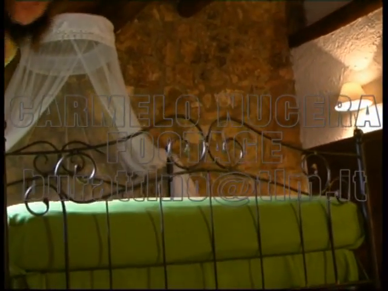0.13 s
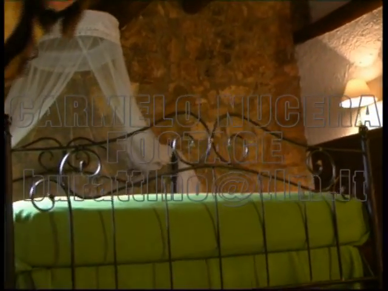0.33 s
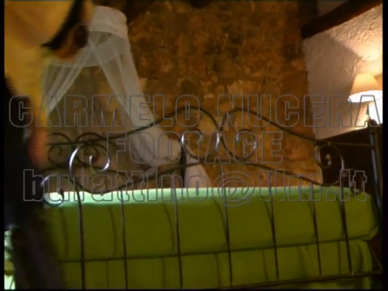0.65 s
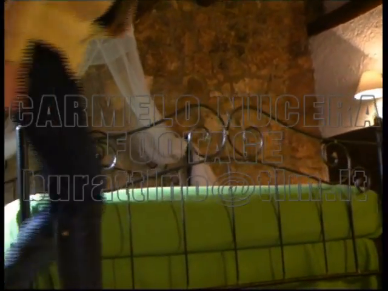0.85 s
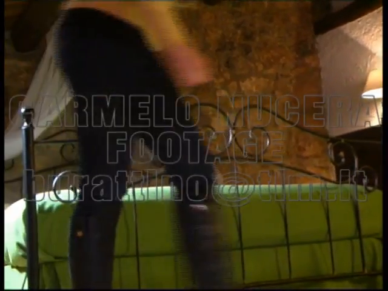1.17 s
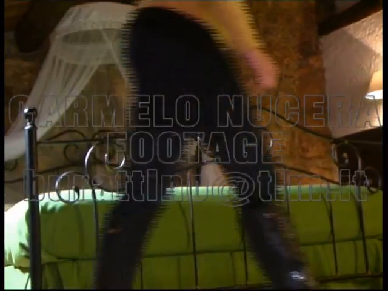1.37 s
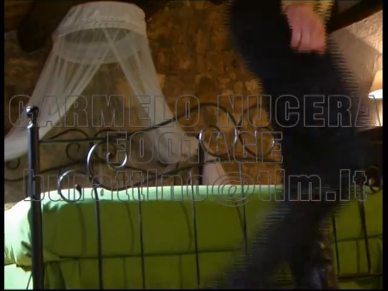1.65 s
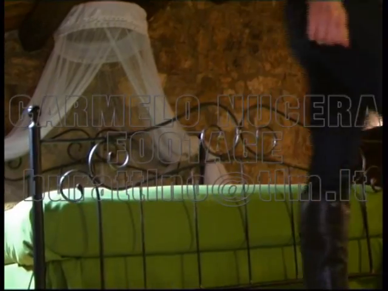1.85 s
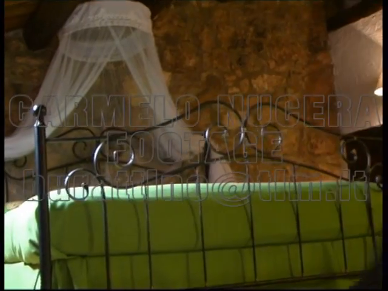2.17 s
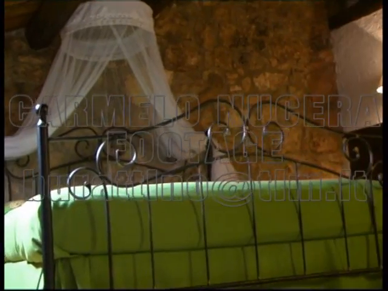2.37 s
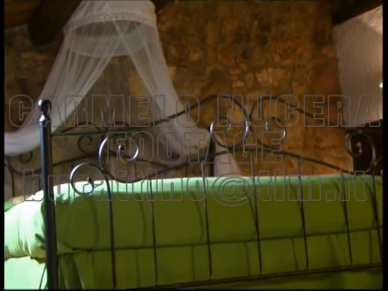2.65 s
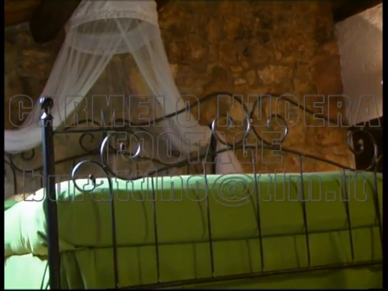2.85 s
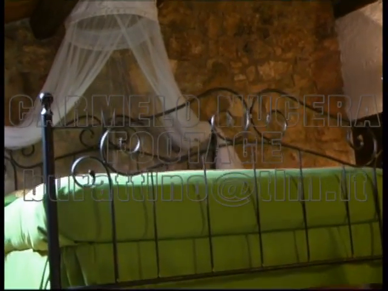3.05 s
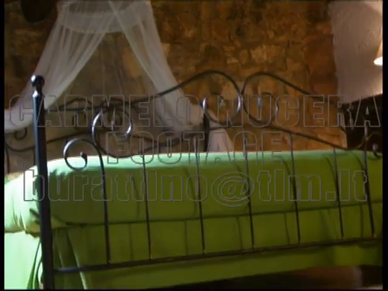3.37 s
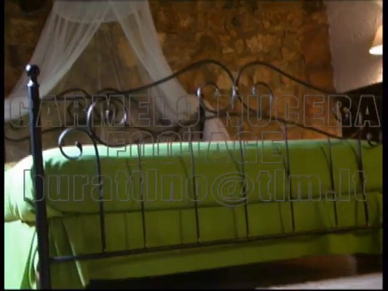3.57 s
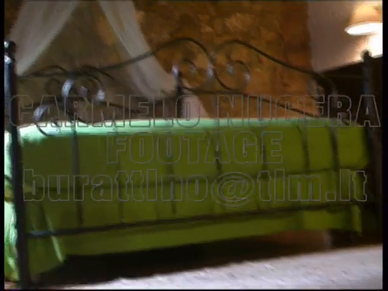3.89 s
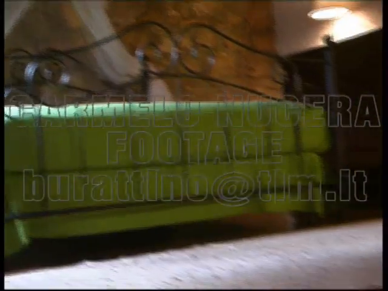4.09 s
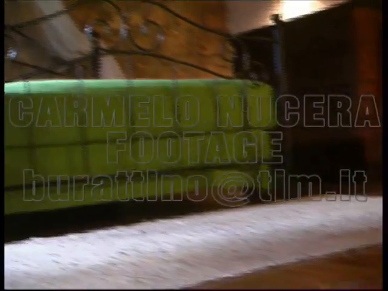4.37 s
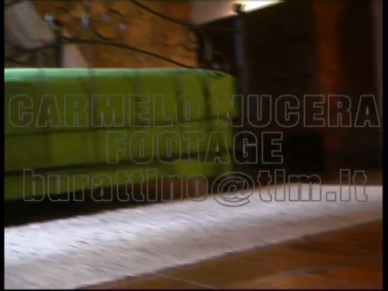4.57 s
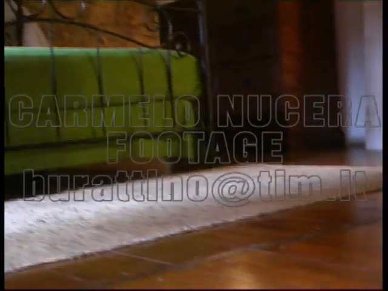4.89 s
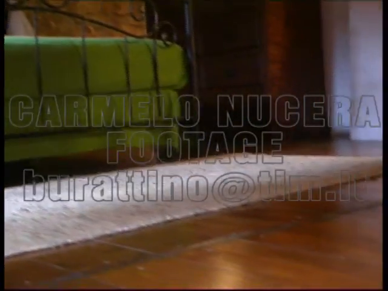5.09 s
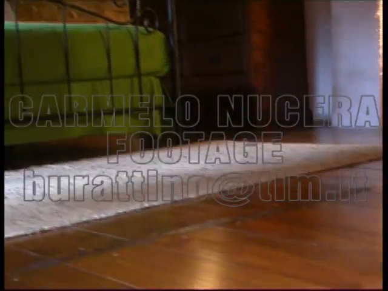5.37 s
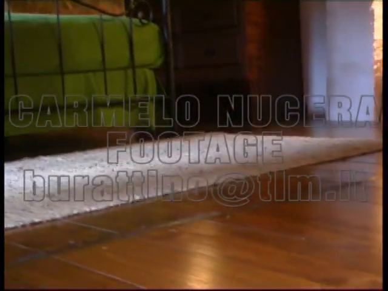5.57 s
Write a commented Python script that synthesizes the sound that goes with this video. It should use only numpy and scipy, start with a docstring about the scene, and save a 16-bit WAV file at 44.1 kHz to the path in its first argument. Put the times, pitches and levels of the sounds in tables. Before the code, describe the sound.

In a slightly echoing room, an appliance hums over a low rumble and faint hiss while someone in boots walks past the microphone on wooden boards. Hollow heel knocks and sole thuds come with light buckle clinks, scuffs and swishing trousers. The fourth step lands hardest, with the clack of a loose board. Three more steps follow, the last one quiet, and then some soft, close thumps.

```python
"""Footsteps in buckled boots cross the wooden floor of a stone-walled bedroom.
Each heel knocks the boards and makes them ring, then the sole lands with a thud and a slap.
Loose boards clack, boots scuff, metal buckles clink, and the room echoes after every hit.
Clothes rustle as the legs swing, and a few soft, dull bumps come and go.
Behind it all are an appliance's hum, a low rumble and a faint hiss."""
import sys
import numpy as np
from scipy import signal
from scipy.fft import rfft, irfft, next_fast_len
from scipy.io import wavfile
from scipy.ndimage import map_coordinates

SR = 44100
rng = np.random.default_rng(int(sys.argv[2]) if len(sys.argv) > 2 else 0)


def unload_audio(sound):
    """Save the sound as a 16-bit wav file, at the path given as the first command line argument."""
    columns = np.transpose(np.atleast_2d(sound))
    # keep every value between -1 and 1, then stretch to whole-number steps
    steps = np.round(np.clip(columns, -1, 1) * 32767)
    wavfile.write(sys.argv[1], SR, steps.astype(np.int16))


N = 253134
HIT_SAMPLES = 32768  # length of one hit with its echo
T = np.arange(HIT_SAMPLES) / SR  # time within a hit [s]
HZ = np.fft.rfftfreq(HIT_SAMPLES, 1 / SR) + 1  # a hit's frequencies, kept above zero
INSTANT = 1.0 * (T == 0)  # a contact that lasts just one sample

# how long the room echoes: (frequency [Hz], time to fade by 60 dB [s])
ECHO_FADE = [(80, 1), (170, 0.69), (350, 0.65), (700, 0.58), (1500, 0.49), (3000, 0.34), (6000, 0.27),
             (12000, 0.23)]
# stereo width of the echo: (frequency [Hz], side compared with middle [dB])
ECHO_WIDTH = [(60, -34), (130, -6), (280, -4), (550, -4), (1100, -1), (8000, -1.5), (12000, -4)]
# stereo width of the background and the cloth: (frequency [Hz], side compared with middle [dB])
NOISE_WIDTH = [(30, -45), (90, 0), (400, -2), (1500, -1.5), (9000, -2), (12000, -5)]
# tone of the rumble and hiss: (frequency [Hz], relative level [dB])
BACKGROUND_TONE = [(20, -14), (45, -2), (85, -6.5), (120, -1), (200, -10), (300, -14.5), (550, -18.5),
                   (900, -21), (1600, -25), (3000, -27.5), (6000, -28), (9000, -31), (12000, -35),
                   (15500, -40.5)]
# the appliance's tones: (frequency [Hz], level [dB])
HUM_TONES = [(150.6, -45.8), (100.2, -65), (823, -78), (15622, -92)]
# tone of rubbing cloth: (frequency [Hz], relative level [dB])
CLOTH_TONE = [(300, 0), (900, 0), (2000, -4), (3200, -3.5), (5000, -3), (7500, -5.5), (10000, -11.5),
              (13000, -24), (16000, -40)]
# tone of a boot's edge on the floor: (frequency [Hz], relative level [dB])
TAP_TONE = [(100, -48.5), (400, 16.5), (750, 12.5), (1100, 8.5), (1650, 2), (2800, -3), (4500, -9),
            (7000, -13), (10000, -25), (15000, -40)]
# the notes a buckle rings at: (frequency [Hz], relative level [dB], time to fade by 60 dB [s])
BUCKLE_NOTES = [(3300, -6, 0.0084), (3530, -0.5, 0.045), (4820, -1, .02), (5290, 3.5, 0.023),
                (5600, -10, 0.016), (7160, -7, 0.012), (9100, 4, 0.021), (9460, 8, 0.026)]
# the notes the floor rings at: (frequency [Hz], width [Hz], level compared with a plain knock [dB])
BOARD_NOTES = [(87, 21, 13.5), (131.6, 2.1, 13.5), (169.2, 40, 10.5), (259, 150, 2), (333, 29, 4.5),
               (409, 14, 2), (505, 7.9, 3), (550, 4.3, 6.5), (636, 31, 5), (782, 52, 6), (1360, 29, -4.5),
               (1556, 20, -2), (1700, 110, -3), (1700, 45, -7), (2780, 100, -1)]
# wide swings of the clothes; more tilt is brighter:
# (peak time [s], level [dB], half-width [s], tilt [dB per octave])
CLOTH_SWISHES = [(.02, -59.5, 0.15, -0.5), (.23, -52, .06, 2), (.71, -55.5, 0.13, -1), (2.022, -66, 0.3, 1),
                 (2.66, -56, 0.17, 5), (4.45, -57.5, 0.11, -1.5), (4.64, -53.5, 0.097, -0.5),
                 (5.08, -54.5, 0.37, -1.2)]
# buckles clinking: (time [s], level [dB], frequency struck hardest [Hz])
BUCKLE_CLINKS = [(0.261, -45.5, 4950), (0.334, -54, 9600), (.503, -48.5, 4170), (1.045, -50.5, 4040),
                 (1.15, -67, 10000), (1.578, -46, 4360), (1.7096, -55.5, 5100), (1.829, -61, 9300),
                 (3.137, -66, 9300)]
# boots scuffing: (time [s], level [dB], tilt [dB per octave], grinding time [s], echo [dB])
BOOT_SCUFFS = [(0.358, -42.5, 4, 0.011, 9), (1.388, -46, 2.5, .0084, -0.5), (1.649, -41.5, 4, 0.0024, 1),
               (2.844, -58, 7.5, 0.0022, 6), (3.041, -52.5, 4, 0.011, -4), (3.248, -60.5, 7, 0.015, 5),
               (4.928, -44, 6.5, 0.0036, 6.5)]
# loose boards clacking: (time [s], level [dB], centre frequency [Hz], echo [dB])
BOARD_CLACKS = [(.985, -52.5, 674, 12), (1.389, -52.5, 970, -6), (2.2895, -51.5, 4350, -14),
                (2.392, -36, 1620, 7.5), (2.394, -44.5, 3100, 14), (2.847, -59, 870, 0),
                (2.982, -40.5, 977, 9), (3.719, -47.5, 2070, -7), (4.428, -60.5, 1620, 1)]
# soft, dull bumps and light shuffles; the last three are low, dry thumps close by:
# (time [s], level [dB], treble cutoff [Hz], echo [dB])
SOFT_BUMPS = [(0.134, -46.5, 690, 14), (.175, -43.5, 550, 11), (2.174, -53, 430, -6),
              (3.135, -41, 890, 0.5), (4.427, -46.5, 436, 0), (5.353, -46, 306, -1),
              (5.394, -39, 157, -2.5), (5.705, -37, 142, 1)]
# soles landing, about a tenth of a second after each heel:
# (time [s], thud level [dB], treble cutoff [Hz], echo [dB], slap level [dB], grinding time [s])
SOLE_LANDINGS = [(0.343, -35.5, 560, 4.5, -48, 0.013), (1.045, -42, 162, 10, -50, 0.0087),
                 (1.691, -41, 157, 17, -66, .01), (2.39, -36.5, 388, 4, -38, 0.013),
                 (3.111, -31.5, 334, 1, -48, 0.0013), (3.84, -38.5, 516, 20, -47, .017),
                 (4.784, -59, 300, 2, -50.5, 0.0041)]
# heels landing, one for each step:
# (time [s], knock level [dB], bass cutoff [Hz], treble cutoff [Hz], echo [dB], click level [dB])
HEEL_STRIKES = [(.244, -27, 181, 634, 9.5, -45.5), (.939, -30.5, 106, 200, 4.5, -50),
                (1.612, -25.5, 96, 273, 1.5, -57.5), (2.2881, -13.5, 173, 626, 5.5, -41),
                (2.978, -21, 175, 690, 8.5, -50), (3.719, -20, 263, 236, 4.5, -36.5),
                (4.634, -33, 199, 364, 0, -55)]


def amp(db):
    """Turn decibels into a number to multiply by."""
    return 10 ** (np.asarray(db) / 20)


def unit(x):
    """Scale a sound to an average (rms) level of 1."""
    return x / np.sqrt(np.mean(x ** 2) + 1e-20)


def along(points, hz):
    """Read between the rows of a (frequency, value) table, on an octave scale."""
    frequencies, values = np.transpose(points)
    return np.interp(np.log(hz + 1), np.log(frequencies), values)


def wobble(rate):
    """A smooth curve through `rate` random values a second."""
    values = rng.standard_normal(int(N * rate / SR) + 4)
    return map_coordinates(values, [np.arange(N) * rate / SR])


def swell(time, width):
    """A smooth rise and fall that peaks at the given time."""
    return np.exp(-((np.arange(N) / SR - time) / width) ** 2)


def filtered(x, gain):
    """Turn each frequency of x up or down by gain(hz)."""
    n = x.shape[-1]
    padded = next_fast_len(n + HIT_SAMPLES // 2)
    return irfft(rfft(x, padded) * gain(np.fft.rfftfreq(padded, 1 / SR)), padded)[..., :n]


def band(centre_hz, octaves):
    """A gain that drops to half at `octaves` above and below one pitch."""
    return 1 / (1 + (np.log2(HZ / centre_hz) / octaves) ** 4)


def pulse(gain):
    """The shortest pulse that starts at time zero and has this gain at each frequency."""
    cepstrum = irfft(np.log(np.maximum(gain, 1e-6)))
    # folding the second half onto the first packs the energy at the start
    cepstrum[1:HIT_SAMPLES // 2] *= 2
    cepstrum[HIT_SAMPLES // 2 + 1:] = 0
    return irfft(np.exp(rfft(cepstrum)))


def stereo_noise(size, width):
    """Noise whose left and right are alike in the bass and less so higher up."""
    noise = rng.standard_normal((2, size))
    middle, side = filtered(noise, lambda hz: amp([0 * hz, along(width, hz)]))
    return np.array([middle + side, middle - side])


def room_echo(rattle, rattle_s=0.03, build_up_s=0.0017):
    """An echo of energy 1 whose treble dies first; rattling boards strengthen its start."""
    hz, t, spectrum = signal.stft(stereo_noise(HIT_SAMPLES, ECHO_WIDTH), SR, nperseg=512)
    fade = amp(-60 * t / along(ECHO_FADE, hz)[:, None])
    tail = signal.istft(spectrum * fade, SR, nperseg=512)[1][:, :HIT_SAMPLES]
    early_boost = 1 + rattle * np.exp(-(T / rattle_s) ** 4)
    build_up = 1 - np.exp(-(T / build_up_s) ** 2)
    return unit(tail * early_boost * build_up) / np.sqrt(HIT_SAMPLES)


def add_hit(out, time, db, blow, contact, echo_db, rattle=0):
    """Mix in a blow, spread over its contact, with an echo echo_db above the direct sound."""
    echo = amp(echo_db) * np.linalg.norm(contact) * room_echo(rattle)
    heard = signal.fftconvolve(blow[None], contact + echo, axes=1)[:, :HIT_SAMPLES]
    heard *= amp(db) / np.sqrt(np.mean(heard[:, :SR // 25] ** 2))  # db is the level of the first 40 ms
    start = max(round(time * SR), 0)
    out[:, start:start + HIT_SAMPLES] += heard[:, :N - start]


def wood():
    """The floor's gain at each frequency: it boosts the notes the boards ring at."""
    peaks = sum(amp(2 * db) / (1 + (2 * (HZ - hz) / width) ** 2) for hz, width, db in BOARD_NOTES)
    return np.sqrt(1 + peaks)


def push(boards, low_hz, high_hz, steepness):
    """A push makes the boards ring; a softer contact has less treble."""
    bass_cut = 1 + (low_hz / HZ) ** 6
    treble_cut = 1 + (HZ / high_hz) ** (2 * steepness)
    return pulse(boards / np.sqrt(bass_cut * treble_cut))


def thud(boards, high_hz):
    """The dull push of a soft, flat contact."""
    return push(boards, low_hz=0.36 * high_hz, high_hz=high_hz, steepness=2.83)


def tap(tilt_db, grind_s, grit_db=-19):
    """A boot's edge clicks down and grinds for a moment: gives the click and its contact."""
    click = pulse(amp(along(TAP_TONE, HZ) + tilt_db * np.log2(HZ / 2000)))
    grit = amp(grit_db) * rng.standard_normal(HIT_SAMPLES) * np.exp(-T / grind_s)
    return click, INSTANT + grit


def rumble_and_hiss(level_db=-54.5):
    """The room's low rumble and a faint microphone hiss."""
    noise = stereo_noise(N, NOISE_WIDTH)
    return amp(level_db) * unit(filtered(noise, lambda hz: amp(along(BACKGROUND_TONE, hz))))


def appliance_hum(waver_db=0.4, drift_radians=0.02):
    """An appliance drones on a few nearly steady tones."""
    t = np.arange(N) / SR
    out = np.zeros(N)
    for hz, db in HUM_TONES:
        height = np.sqrt(2) * amp(db + waver_db * wobble(4.38))
        out += height * np.sin(2 * np.pi * hz * t + drift_radians * wobble(2.4))
    return out


def cloth_rub(tilt_db):
    """The noise of rubbing cloth; more tilt gives the brighter sound of a faster rub."""
    noise = stereo_noise(N, NOISE_WIDTH)
    return unit(filtered(noise, lambda hz: amp(along(CLOTH_TONE, hz) + tilt_db * np.log2((hz + 1) / 2000))))


def clothes(rustle_db=-56.5, delay_s=0.12, half_width_s=0.18, flutter_db=0.6):
    """Trousers rustle as they settle after each heel, and swish as the legs swing."""
    settling = sum(swell(time + delay_s, half_width_s) for time, *_ in HEEL_STRIKES)
    rustle = amp(rustle_db) * settling * cloth_rub(tilt_db=0)
    swishes = sum(amp(db) * swell(time, width) * cloth_rub(tilt_db)
                  for time, db, width, tilt_db in CLOTH_SWISHES)
    return amp(flutter_db * wobble(40)) * (rustle + swishes)


def buckles(tick_db=1, tick_fade_s=0.065, spread_db=3, detune=0.004):
    """Small metal buckles jump with the stride, ticking and ringing a little differently each time."""
    out = np.zeros((2, N))
    for time, db, centre_hz in BUCKLE_CLINKS:
        ring = np.zeros(HIT_SAMPLES)
        for hz, note_db, fade_s in BUCKLE_NOTES:
            fade = amp(note_db + spread_db * rng.normal() - 60 * T / fade_s)
            ring += fade * np.sin(2 * np.pi * hz * (1 + detune * rng.normal()) * T)
        tick = amp(tick_db - 60 * T / tick_fade_s) * rng.standard_normal(HIT_SAMPLES)
        strike = pulse(band(centre_hz, octaves=0.49))
        clink = signal.fftconvolve(ring + tick, strike)[:HIT_SAMPLES]
        add_hit(out, time, db, clink, INSTANT, echo_db=-2)
    return out


def scuffs():
    """A boot catches the floor in passing."""
    out = np.zeros((2, N))
    for time, db, tilt_db, grind_s, echo_db in BOOT_SCUFFS:
        add_hit(out, time, db, *tap(tilt_db, grind_s), echo_db)
    return out


def loose_boards():
    """A loose board snaps against its neighbour with a hollow clack."""
    out, boards = np.zeros((2, N)), wood()
    for time, db, centre_hz, echo_db in BOARD_CLACKS:
        clack = pulse(band(centre_hz, octaves=0.52) * boards)
        add_hit(out, time, db, clack, INSTANT, echo_db)
    return out


def soft_bumps():
    """Soft, dull bumps and light shuffles, ending with three low, dry thumps close by."""
    out, boards = np.zeros((2, N)), wood()
    for time, db, high_hz, echo_db in SOFT_BUMPS:
        add_hit(out, time, db, thud(boards, high_hz), INSTANT, echo_db, rattle=0.54)
    return out


def soles():
    """The foot rolls forward and its sole lands with a thud and a slap."""
    out, boards = np.zeros((2, N)), wood()
    for time, thud_db, high_hz, echo_db, slap_db, grind_s in SOLE_LANDINGS:
        add_hit(out, time, thud_db, thud(boards, high_hz), INSTANT, echo_db, rattle=0.58)
        add_hit(out, time, slap_db, *tap(tilt_db=1, grind_s=grind_s), echo_db)
    return out


def heels():
    """Each heel knocks the boards and clicks with its hard edge."""
    out, boards = np.zeros((2, N)), wood()
    for time, knock_db, low_hz, high_hz, echo_db, click_db in HEEL_STRIKES:
        steepness = 4.58 * (high_hz / 500) ** 0.33  # the treble falls faster past a higher cutoff
        knock = push(boards, low_hz, high_hz, steepness)
        add_hit(out, time, knock_db, knock, INSTANT, echo_db, rattle=0.58)
        add_hit(out, time, click_db, *tap(tilt_db=2, grind_s=0.0049), echo_db=10)
    return out


def scene():
    """The walk over the room's steady background."""
    walk = heels() + soles() + soft_bumps() + loose_boards() + scuffs() + buckles() + clothes()
    return walk + appliance_hum() + rumble_and_hiss()


def record(dry, top_hz=15800):
    """Cut away the very highest treble."""
    return filtered(dry, lambda hz: hz < top_hz)


dry = scene()
out = record(dry)
unload_audio(out)
```